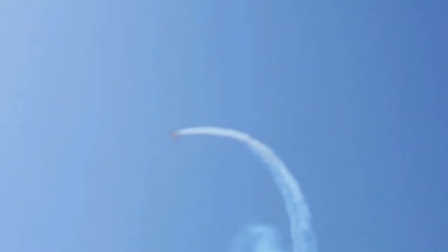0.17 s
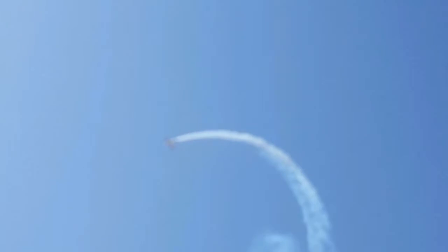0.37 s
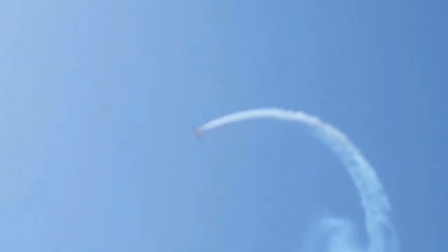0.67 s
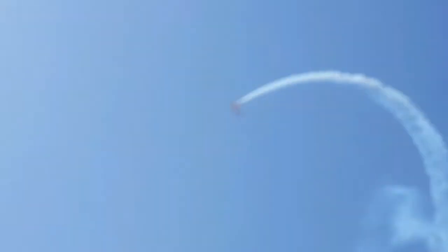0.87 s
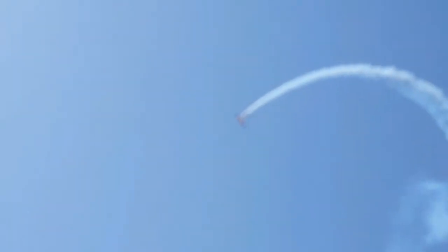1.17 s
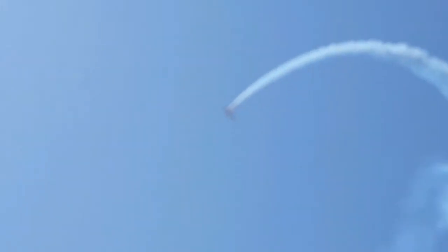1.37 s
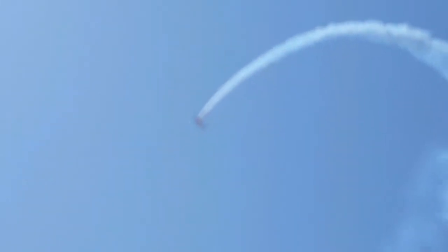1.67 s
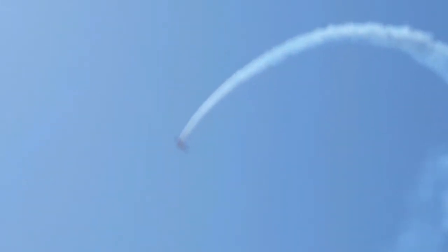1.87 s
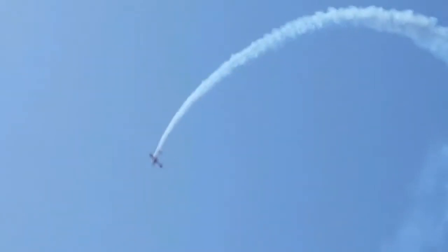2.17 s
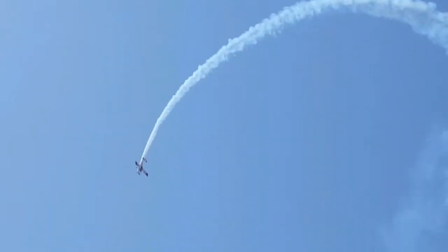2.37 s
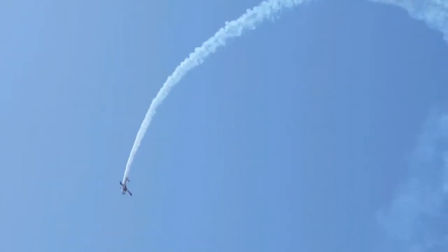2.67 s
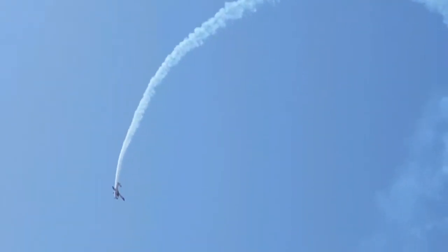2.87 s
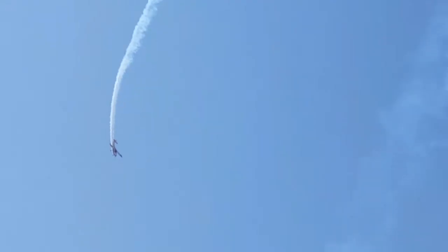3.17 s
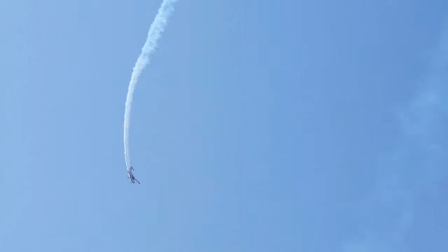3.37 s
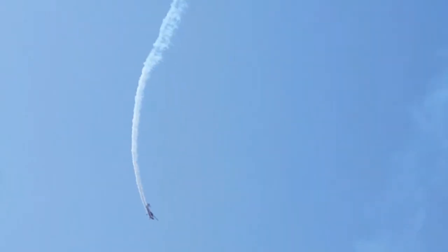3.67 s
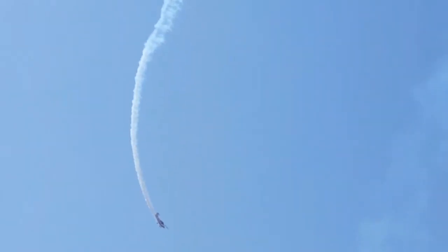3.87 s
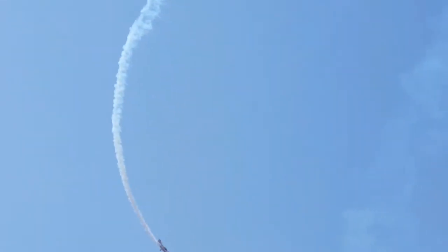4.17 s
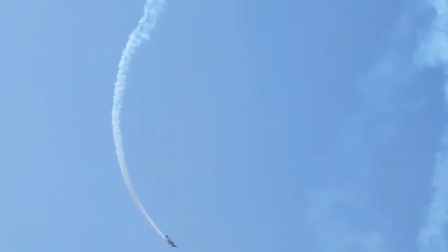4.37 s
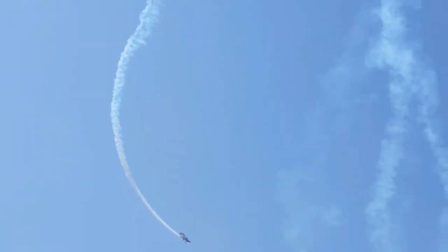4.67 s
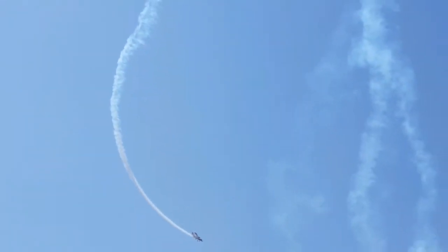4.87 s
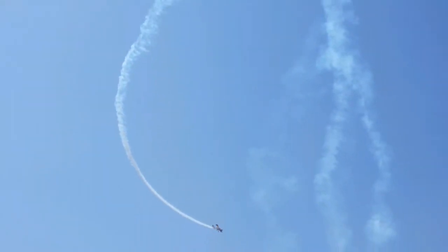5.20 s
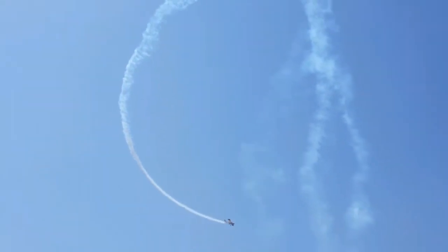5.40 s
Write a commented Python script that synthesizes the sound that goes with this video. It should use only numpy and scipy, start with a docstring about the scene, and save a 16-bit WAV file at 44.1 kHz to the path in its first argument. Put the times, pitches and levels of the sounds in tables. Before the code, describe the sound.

A distant aerobatic plane rushes through open air, a low roar and crackling hiss that swells unevenly as it dives out of a loop.

```python
"""An aerobatic plane dives out of a loop, far from a small hand-held microphone. Its engine is shaped noise mixed
with small shocks: a jet-like rush of low roar and crackling hiss, swelling in the restless air.
A ground echo closes up in the dive and opens a little at the end, so the hollow colour sweeps upward, then eases back.
Delayed copies off surfaces near the microphone, and moving filters, comb the rush into drifting ridges.
Something like a generator, a wavering sine, hums on the quiet airfield over soft noise."""
import sys
import numpy as np
from scipy import signal
from scipy.fft import rfft, irfft
from scipy.io import wavfile
from scipy.ndimage import uniform_filter1d, map_coordinates

SR = 44100
rng = np.random.default_rng(int(sys.argv[2]) if len(sys.argv) > 2 else 0)


def unload_audio(sound):
    """Save the sound as a 16-bit wav file, at the path given as the first command line argument."""
    columns = np.transpose(np.atleast_2d(sound))
    # keep every value between -1 and 1, then stretch to whole-number steps
    steps = np.round(np.clip(columns, -1, 1) * 32767)
    wavfile.write(sys.argv[1], SR, steps.astype(np.int16))


N = 244137
TIME = np.arange(N) / SR  # s

# spectrum of the hiss, before scaling to rms 1: freq_hz, density_db
HISS_SPECTRUM = [(400, -26.5), (1000, -6.5), (1600, 3.5), (2100, 1.5), (3100, 5.5), (4000, -0.5),
                 (4500, -8.5), (5100, -18), (6200, -43), (8000, -25.5)]
# brightness of the rush: start_s, sizzle_over_hiss_db (before trim), treble_edge_hz
BRIGHTNESS_TRACK = [(0, -34, 7460), (0.551, -41, 7750), (.95, -24.5, 5170), (1.848, -19, 8050),
                    (3.65, -17, 10000), (4.3, -18, 6840), (5.049, -24, 6840), (5.54, -13.5, 6940)]
# ground echo of the plane: start_s, lag_ms, share_of_direct, first_ridge_lift_db
GROUND_TRACK = [(0, 1.67, 0.25, 1), (1.05, 1.73, 0.054, 9), (2.05, 1.73, 0.29, -1.5),
                (2.3, 1.73, 0.085, -3), (2.6, 1.5, 0.19, 6.5), (3.05, 1.1, 0.054, 1),
                (3.65, 1.08, 0.066, 5.5), (4.2, 0.95, 0.35, 1), (5, 0.925, 0.17, 0),
                (5.54, 1.26, 0.15, -0.5)]


def undb(db):
    """Decibels to gain."""
    return 10 ** (np.asarray(db) / 20)


def curves(table, at):
    """The columns of a table, joined by straight lines and read at the given times."""
    s, *columns = np.transpose(table)
    return [np.interp(at, s, column) for column in columns]


def shape(points, hz):
    """Gain of a spectrum given as (Hz, dB) points, joined on a log-frequency axis."""
    freq_hz, db = np.transpose(points)
    return undb(np.interp(np.log(hz + 1), np.log(freq_hz), db))


def bell(hz, centre, octaves):
    """A bell of height 1 on a log-frequency axis."""
    return np.exp(-(np.log2((hz + 1) / centre) / octaves) ** 2)


def unit(x):
    """Scale to rms 1 about the mean."""
    return x / np.std(x)


def tint(x, points):
    """Give a sound a fixed spectrum, at rms 1."""
    hz = np.fft.rfftfreq(N, 1 / SR)
    return unit(irfft(rfft(x) * shape(points, hz), N))


def sweep(x, gain, frame=1024, hop=256):
    """Filter whose gain(Hz, s) moves in time, applied to short overlapping spectra."""
    hz, s, frames = signal.stft(x, SR, nperseg=frame, noverlap=frame - hop)
    moved = frames * gain(hz[:, None], s)
    return signal.istft(moved, SR, nperseg=frame, noverlap=frame - hop)[1][:N]


def walk(rate_hz):
    """Smooth chance with spread 1: noise that falls away above the given rate."""
    hz = np.fft.rfftfreq(N, 1 / SR)
    return unit(irfft(rfft(rng.standard_normal(N)) / (1 + (hz / rate_hz) ** 4), N))


def flutter(rate_hz):
    """Quick chance with spread 1, its slow drift taken out."""
    quick = walk(rate_hz)
    return unit(quick - uniform_filter1d(quick, SR // 12))


def with_dive(ends, at, tip_s=2.96, tip_span_s=0.25):
    """Glide from a value at the top of the loop to its value in the dive, about the tipping time."""
    top, dive = ends
    return top + (dive - top) * (1 + np.tanh((at - tip_s) / tip_span_s / 2)) / 2


def airfield_floor(floor_db=-59.0):
    """The soft outdoor floor around the microphone: steady noise with a fixed spectrum."""
    # outdoor floor, before scaling to rms 1: freq_hz, density_db
    field_spectrum = [(20, -18), (35, -3.5), (50, -24), (72, 8), (115, -4.5), (160, 3.5), (230, -8.5),
                      (500, -3.5), (3000, -11.5), (6000, -27.5), (8500, -60.5)]
    return undb(floor_db) * tint(rng.standard_normal(N), field_spectrum)


def generator_hum(hum_hz=99.3, trim_db=-1.0, waver=.38, drift=0.006):
    """A distant generator-like hum: one sine wavering in pitch, strength and phase, fading in and out a little."""
    # hum at the microphone: start_s, level_db (before trim)
    hum_track = [(0, -66), (.6, -67), (1.15, -57.5), (2.6, -63.5), (3.2, -61.5), (3.5, -68), (4.2, -65),
                 (4.8, -62), (5.54, -59.5)]
    phase = 2 * np.pi * np.cumsum(hum_hz * (1 + drift * walk(2.1))) / SR
    in_phase = np.sin(phase) * (1 + waver * walk(7))
    quadrature = waver * np.cos(phase) * walk(7)
    level_db = trim_db + curves(hum_track, TIME)[0]
    return undb(level_db) * unit(in_phase + quadrature)


def scatter(x, wet_db=-14, t60_s=0.11):
    """Things standing around the microphone return a short, diffuse tail: decaying noise as an echo pattern."""
    t = TIME[:SR // 5]
    after_gap = t > .006  # s
    tail = rng.standard_normal(len(t)) * undb(-60 * t / t60_s) * after_gap
    return x + undb(wet_db) * signal.fftconvolve(x, tail / np.linalg.norm(tail))[:N]


def near_echoes(x):
    """Delayed copies off two surfaces about half a metre away comb the rush into evenly spaced ridges."""
    # echoes changing as the plane moves, one table per surface: start_s, lag_ms, share_of_direct
    near_surface = [(0, 2.96, 0.096), (1.8, 3.3, 0.066), (2.9, 3.15, 0.12), (3.9, 2.9, 0.12),
                    (4.4, 3.05, .16), (5, 3.03, 0.16), (5.3, 3.2, 0.054)]
    further_surface = [(0, 3.2, 0.04), (2.4, 4.1, 0.046), (3.3, 3.13, 0.2), (4, 3.5, 0.18), (4.5, 3, .02)]
    out = x
    for table in (near_surface, further_surface):
        lag_ms, share = curves(table, TIME)
        out = out + share * map_coordinates(x, [(TIME - lag_ms / 1000) * SR], order=1)
    return out


def ground_echo(x, dull_hz=4200):
    """The ground returns a duller copy, its lag and strength changing with the plane's path."""
    lag_ms, share, _ = curves(GROUND_TRACK, TIME)
    dull = signal.sosfiltfilt(signal.butter(1, dull_hz, fs=SR, output="sos"), x)
    echo = map_coordinates(dull, [(TIME - lag_ms / 1000) * SR], order=3)
    return (x + share * echo) / np.sqrt(1 + share ** 2)


def phasing(x):
    """Narrow ridges and notches slide through the rush as the paths to the microphone change."""
    # ridges and notches that fade and may turn over, every track: start_s, centre_hz, lift_db
    roar_drone = [(0.0, 459, 14), (1.2, 404, 4), (2.2, 402, 2.5), (3.2, 404, 5.5), (4.2, 434, 4.5),
                  (4.8, 463.0, -0.5), (5.54, 417, 2)]
    roar_trough = [(0.0, 490, -1.5), (1.0, 450, -3.5), (1.8, 480, 8), (2.2, 486, -10.5), (2.7, 444, -8.5),
                   (3.3, 460, -4), (3.8, 581.0, -3), (4.7, 478.0, -2.5), (5.54, 440.0, -8)]
    roar_crest = [(0.0, 1163.0, 2.5), (1.2, 1105, 7), (2.5, 1070, -1), (2.75, 1120, 7.5), (3.3, 1010.0, 2),
                  (4.0, 1031.0, -2), (4.4, 1096, 3), (4.8, 1083.0, 3.5), (5.54, 1065.0, 3.5)]
    low_ridge = [(0.0, 1370, 5.1), (1.0, 1484, 5.5), (2.2, 1470, 9.4), (2.7, 1540, 3.0), (3.2, 1380, 3.3),
                 (3.8, 1410, 11), (4.3, 1600, 0.5), (4.8, 1740, 9.9), (5.54, 1794.0, 0.5)]
    low_notch = [(0.0, 2170, 8), (0.8, 1810, -12.5), (2.0, 1847.0, -5.5), (2.75, 1830, -10),
                 (3.25, 1802.0, 0), (3.65, 1682.0, -0.5), (4.3, 1860, -1.5), (4.9, 1968.0, -4.5),
                 (5.4, 1840, -7.0)]
    mid_ridge = [(0.0, 1720, 8), (0.7, 1924.0, 1.5), (1.3, 2015.0, 8.5), (2.3, 2010, 1.5), (3.25, 2030, 5),
                 (3.9, 2190, 3), (4.4, 2340, 6.5), (5.54, 2457.0, -3)]
    thin_notch = [(0.0, 2510, -10), (0.8, 2420, -1), (2.2, 2406.0, -3), (2.9, 2412.0, -6),
                  (3.3, 2443.0, -8), (3.8, 2428.0, 1.5), (4.25, 2450, -7), (4.8, 2550, -0.5),
                  (5.54, 2536.0, -4.5)]
    thin_ridge = [(0, 2590, 0.5), (.8, 2660, 3.5), (1.9, 2590, 5.5), (2.6, 2570, 0.5), (3.8, 2640, 6),
                  (4.3, 2620, 4.5), (5, 2740, 5), (5.54, 2700, -4)]
    mid_notch = [(0.0, 2920, -8.5), (2.0, 3120, 2.5), (2.5, 3230, -4), (2.8, 3060, -14), (3.3, 2950, 2),
                 (3.8, 2916.0, -1), (4.25, 2780, -4), (4.8, 3070, -1.5), (5.54, 3022.0, -5)]
    upper_ridge = [(0.0, 3170, -5.5), (1.4, 3279.0, -1), (2.4, 3330.0, 4), (2.8, 3400, 7), (3.3, 3430, 1),
                   (3.7, 3206.0, -1.0), (4.2, 3160.0, 3.5), (4.6, 3280, 4), (5.05, 3280, 1),
                   (5.54, 3170, 6.5)]
    high_notch = [(0.0, 3413.0, -8), (1.0, 3680, -4.5), (2.3, 3420, 1), (2.8, 3640, -6), (3.3, 3830, -4),
                  (3.55, 3550, -9), (3.9, 3570, 0), (4.3, 3830, -9), (4.8, 3801.0, -1.5),
                  (5.54, 3653.0, -5)]
    high_ridge = [(0.0, 4050, -7.5), (1.2, 3920, 2), (2.1, 3800, 5.0), (2.75, 4130, -1), (3.25, 4160, 6.0),
                  (3.85, 4040, 0), (4.15, 4300, 7), (4.38, 4539.0, 0.5), (4.8, 4473.0, 2),
                  (5.54, 4472.0, 1)]
    top_notch = [(0.0, 4700, -9), (1.2, 4740, -2.0), (2.1, 4600, 2), (2.5, 4580, -13), (2.75, 4600, -6.0),
                 (3.4, 4712.0, -6.5), (4.2, 4740, -3.0), (5.0, 4666.0, -3), (5.54, 4700, -11)]
    # (track, half width Hz)
    tracks = [(roar_drone, 40), (roar_trough, 60), (roar_crest, 100), (low_ridge, 90), (low_notch, 100),
              (mid_ridge, 170), (thin_notch, 55), (thin_ridge, 60), (mid_notch, 110), (upper_ridge, 90),
              (high_notch, 130), (high_ridge, 150), (top_notch, 70)]

    def ripple(hz, s):
        total_db = 0
        for track, half_width_hz in tracks:
            centre_hz, lift_db = curves(track, s)
            total_db = total_db + lift_db * np.exp(-((hz - centre_hz) / half_width_hz) ** 2)
        return undb(total_db)
    return sweep(x, ripple)


def restless_air(x, depth_db=1.08, rate_hz=15, hollow_octaves=0.16):
    """Turbulence makes each region twinkle on its own; a band between roar and hiss drifts. Besides that, the
    treble edge opens and closes."""
    # band between roar and hiss, hollow or raised: start_s, centre_hz, lift_db
    hollow_track = [(0, 1500, 2.5), (1, 1700, 0), (2.15, 1760, -8.5), (2.6, 1760, 4.5), (3.2, 1580, -5),
                    (4.1, 1280, -14), (4.6, 1440, 1.5), (5.15, 1420, 2.5), (5.4, 2070, -3)]
    centres_hz = 700 * 2 ** (np.arange(9) * .38)
    walks = [walk(rate_hz) for _ in centres_hz]

    def path(hz, s):
        twinkle = sum(bell(hz, c, 0.38) * np.interp(s, TIME, w) for c, w in zip(centres_hz, walks))
        hollow_hz, hollow_db = curves(hollow_track, s)
        edge_hz = curves(BRIGHTNESS_TRACK, s)[1]
        gain = undb(depth_db * twinkle + hollow_db * bell(hz, hollow_hz, hollow_octaves))
        return gain / (1 + (hz / edge_hz) ** 18)
    return sweep(x, path)


def shock_train(per_s=380, spread_db=1.0):
    """Small shocks of unequal size from the exhaust: single-sample clicks at random times, at rms 1."""
    struck = rng.random(N) < per_s / SR
    size_db = spread_db * np.minimum(rng.exponential(size=N), 4)
    return unit(struck * undb(size_db))


def eddies(shocks, shock_db):
    """Turbulent noise of which a part comes as shocks."""
    return (rng.standard_normal(N) + undb(shock_db) * shocks) / np.hypot(1, undb(shock_db))


def hollow_note(note_hz=427, width_hz=93, level_db=-43.5, peak_s=0.69, span_s=0.46):
    """A narrow band of noise swells and fades like a rough note while the plane hangs at the top."""
    hz = np.fft.rfftfreq(N, 1 / SR)
    band = irfft(rfft(rng.standard_normal(N)) / (1 + (2 * (hz - note_hz) / width_hz) ** 4), N)
    swell = np.exp(-((TIME - peak_s) / span_s) ** 2)
    return undb(level_db) * swell * unit(band)


def growl(x, width_octaves=0.24, trough_ratio=.58, trough_share=0.49, trough_octaves=0.12):
    """The lowest ridge of the ground echo colours one band of the roar, which climbs as the lag shrinks."""
    def ridge(hz, s):
        lag_ms, _, lift_db = curves(GROUND_TRACK, s)
        centre_hz = 1000 / lag_ms  # one whole wave fits the lag
        crest = bell(hz, centre_hz, width_octaves)
        trough = trough_share * bell(hz, trough_ratio * centre_hz, trough_octaves)
        return undb(lift_db * (crest - trough))
    return sweep(x, ridge)


def turning(x, width_octaves=0.29):
    """One band of the hiss wanders and rises or sinks as the plane turns; the nominal total power stays."""
    # wandering band of the hiss: start_s, centre_hz, lift_db (before the power is evened out)
    beam_track = [(0, 1750, -13.5), (.75, 2760, 1.5), (1.35, 2230, 1), (1.65, 2500, -4), (2.05, 2800, -1.5),
                  (2.7, 2950, 6.5), (3.05, 3000, 4.5), (3.3, 4140, 3.5), (4.25, 3980, 14.5),
                  (4.45, 3600, 9), (5.05, 3510, 10), (5.4, 3620, 15)]

    def beam(hz, s):
        centre_hz, lift_db = curves(beam_track, s)
        gain = undb(lift_db * bell(hz, centre_hz, width_octaves))
        power = shape(HISS_SPECTRUM, hz) ** 2
        return gain * np.sqrt(power.sum() / (power * gain ** 2).sum(axis=0))
    return sweep(x, beam)


def crackle(source, points, flutter_db=0.69):
    """Fine eddies hiss and flutter; the shocks crackle through them."""
    return tint(source, points) * undb(flutter_db * flutter(35))


def rumble():
    """The lowest part of the engine: steady noise with a fixed spectrum, at rms 1."""
    # rumble of the plane, before scaling to rms 1: freq_hz, density_db
    rumble_spectrum = [(45, -31), (70, -20.5), (150, -14), (220, -9), (290, -0.5), (420, 5), (520, 9.5),
                       (700, -19.5), (1500, -38.5)]
    return tint(rng.standard_normal(N), rumble_spectrum)


def roar(source, width_octaves=0.75, skirt_db=-19, flutter_db=0.5, low_hz=380, high_hz=2600):
    """Large eddies of the exhaust: a broad, fluttering hump of noise."""
    # centre of the hump: top_of_loop_hz, dive_hz
    hump_hz = (780, 974)

    def hump(hz, s):
        octaves = np.log2((hz + 1) / with_dive(hump_hz, s))
        gain = undb(skirt_db * (1 - np.exp(-.5 * (octaves / width_octaves) ** 2)))
        low_cut = 1 + (low_hz / (hz + 1)) ** 6
        high_cut = 1 + (hz / high_hz) ** 4
        return gain / low_cut / high_cut
    return unit(sweep(source, hump)) * undb(flutter_db * flutter(33))


def gusts():
    """Brief surges and lulls in the gusty air, in dB for the roar and for the hiss."""
    # bell-shaped surges and lulls: centre_s, half_length_s, roar_db, hiss_db
    surge_table = [(0.697, 0.031, 2.5, 0), (0.834, 0.016, -4.5, -4.5), (0.902, .015, -4, 1.5),
                   (1.158, 0.033, 6, 0.5), (1.4, 0.035, -3.5, 4), (1.494, 0.058, -5.5, 1.5),
                   (1.6, .02, 2, 0), (1.69, 0.059, -4, 3), (1.763, 0.024, -7.5, -4.5),
                   (1.868, 0.051, 0.5, 0.5), (1.979, 0.025, -5.5, 3), (2.029, 0.011, -8, 0),
                   (2.062, 0.011, 0, 5.5), (2.138, .012, 2, 1.5), (2.197, 0.015, 5.5, -2.5),
                   (2.247, .014, -0.5, 4), (2.287, 0.01, -3, 4), (2.357, 0.008, 0, 7),
                   (2.465, 0.092, 6.5, -1), (2.548, .012, 1, 1.5), (2.577, 0.017, -2, -2.5),
                   (2.82, 0.016, 0, 4.5), (2.857, 0.021, -4.5, 3.5), (2.994, 0.031, 2.5, 0),
                   (3.238, 0.014, -5, 4), (3.636, 0.033, -2.5, 2.5), (3.995, 0.035, 2.5, -3.5),
                   (4.143, 0.029, 1.5, 2), (4.267, 0.066, 1.5, 0), (4.466, .03, 2.5, -1),
                   (4.681, 0.022, -2, 7.5), (4.93, .025, -0.5, 2), (5.012, .012, 0.5, 3.5),
                   (5.084, 0.0076, 2.5, 0), (5.138, 0.013, 0, 0), (5.162, 0.02, 1.5, 3.5),
                   (5.323, 0.062, -7, 2), (5.27, 0.017, -2, -3), (5.33, 0.042, -2.5, 3)]
    total_db = np.zeros((2, N))
    for centre_s, half_length_s, *peaks_db in surge_table:
        total_db += np.outer(peaks_db, np.exp(-((TIME - centre_s) / half_length_s) ** 2))
    return total_db


def plane(roar_db=-0.56, hiss_db=2.0, rumble_db=2.5, sizzle_db=11.5, roar_shocks_db=-6,
          swell_db=0.5, swell_rate_hz=22):
    """Rumble, roar, hiss and sizzle of the engine, swelling and heard through the air and off the ground."""
    # one table per layer: start_s, level_db (before trim and surges)
    roar_track = [(0, -30.5), (.3, -33), (.5, -35.5), (1.15, -35), (1.75, -31), (2.25, -30), (2.5, -34.5),
                  (2.8, -31.5), (3.65, -33), (4.1, -30), (4.43, -26), (4.65, -28.5), (5.17, -28),
                  (5.3, -24), (5.41, -27), (5.53, -30)]
    hiss_track = [(0, -38), (0.339, -36), (0.469, -41), (0.692, -30.5), (.95, -34), (1.349, -30),
                  (2.3, -29.5), (3.15, -28.5), (3.479, -32.5), (3.652, -29.5), (4.472, -33), (4.533, -26.5),
                  (4.66, -28), (4.77, -35.5), (4.902, -27), (5.09, -23.5), (5.14, -33), (5.25, -36.5),
                  (5.53, -42)]
    rumble_track = [(0, -48), (.9, -46.5), (2.1, -55.5), (3.599, -49), (4.599, -42), (5.54, -42)]
    # shocks in the hiss, before the roar's own trim: start_s, shocks_over_smooth_noise_db
    shock_track = [(0, -4.5), (1.3, -8.5), (3.3, -7), (4.4, -8.5), (4.65, -3.5), (5.08, -0.5), (5.25, -5),
                   (5.54, -4.5)]
    # sizzle of the plane, before scaling to rms 1: freq_hz, density_db
    sizzle_spectrum = [(2500, -13), (3600, 0.5), (4400, 22), (5200, 7.5), (6000, 0), (7000, -4),
                       (9000, -35.5)]

    shock_db = curves(shock_track, TIME)[0]
    shocks = shock_train()  # one train shared by roar, hiss and sizzle
    roar_surge, hiss_surge = gusts()
    roar_level = curves(roar_track, TIME)[0] + roar_surge
    hiss_level = curves(hiss_track, TIME)[0] + hiss_surge + swell_db * flutter(swell_rate_hz)
    rumble_level = curves(rumble_track, TIME)[0]
    sizzle_level = hiss_level + curves(BRIGHTNESS_TRACK, TIME)[0]

    low = undb(roar_level + roar_db) * roar(eddies(shocks, shock_db + roar_shocks_db))
    low = low + undb(rumble_level + rumble_db) * rumble()
    hiss = undb(hiss_level + hiss_db) * turning(crackle(eddies(shocks, shock_db), HISS_SPECTRUM))
    sizzle = undb(sizzle_level + sizzle_db) * crackle(eddies(shocks, shock_db), sizzle_spectrum)

    engine = growl(low) + hollow_note() + hiss + sizzle
    through_air = phasing(restless_air(engine))
    return scatter(near_echoes(ground_echo(through_air)))


def scene():
    """The plane over the airfield, in one channel."""
    return (airfield_floor() + generator_hum() + plane())[None]


def record(dry, top_hz=9100):
    """The microphone and the surfaces close to it add peaks and dips, and the recorder cuts the top."""
    # resonances and dips of the microphone and its surroundings: centre_hz, width_hz, lift_db
    colour_table = [(416.4, 30, 6.5), (467, 105, -9), (727, 182, -4.5), (877, 28, 3.5), (938, 43, -6),
                    (1284, 25, 2.5), (1463, 370, -9.5), (1820, 224, -3), (2390, 86, 1), (3424, 940, -3.5),
                    (3680, 600, -2), (4334, 78, -8), (4950, 200, -2.5)]
    hz = np.fft.rfftfreq(N, 1 / SR)
    colour_db = sum(db / (1 + (2 * (hz - centre) / width) ** 2) for centre, width, db in colour_table)
    coloured = irfft(rfft(dry) * undb(colour_db), N)
    return signal.sosfilt(signal.ellip(10, .2, 80, top_hz, fs=SR, output="sos"), coloured)


dry = scene()
out = record(dry)
unload_audio(out)
```